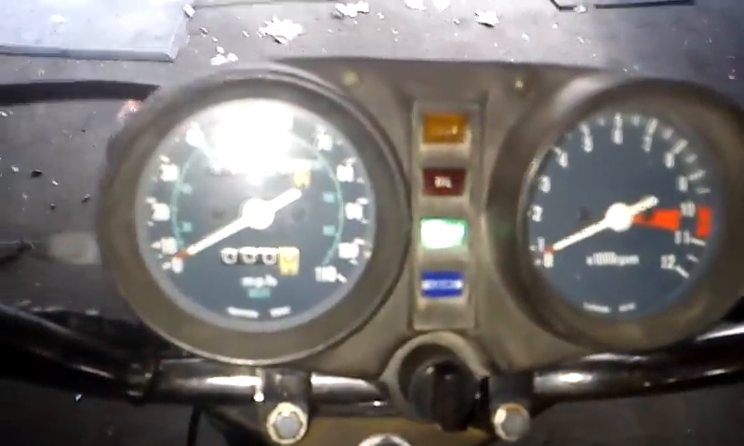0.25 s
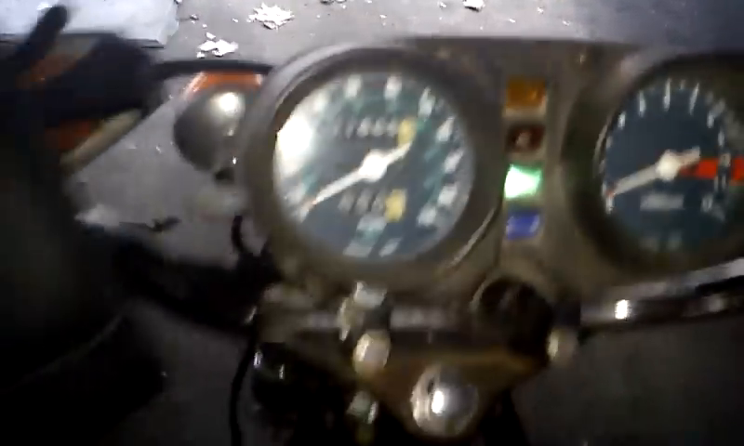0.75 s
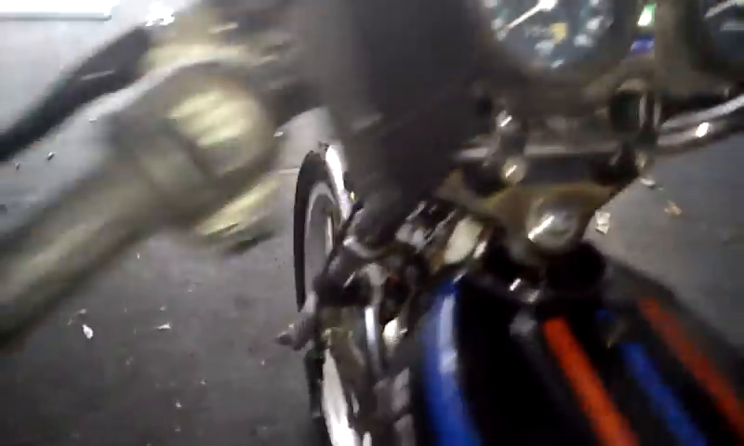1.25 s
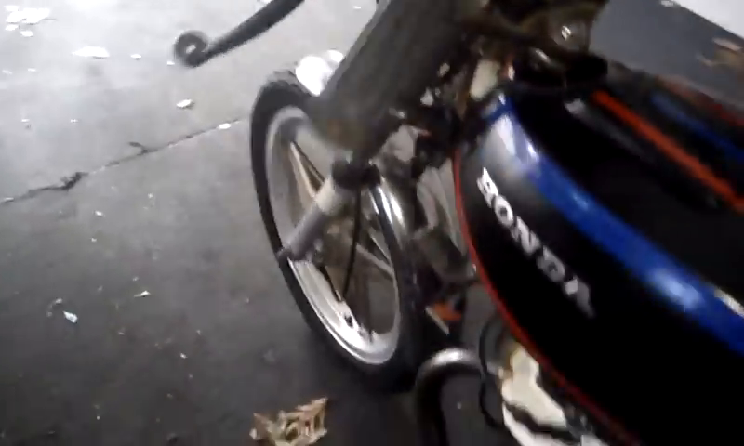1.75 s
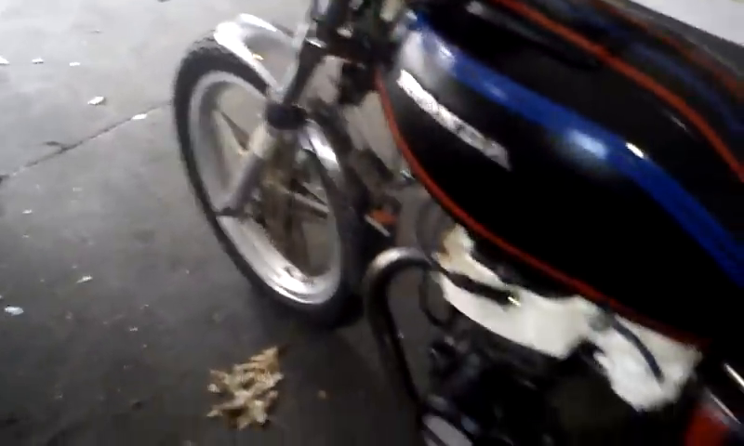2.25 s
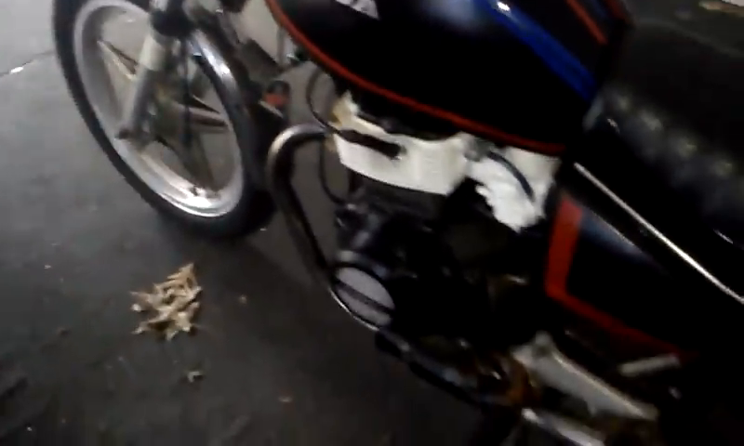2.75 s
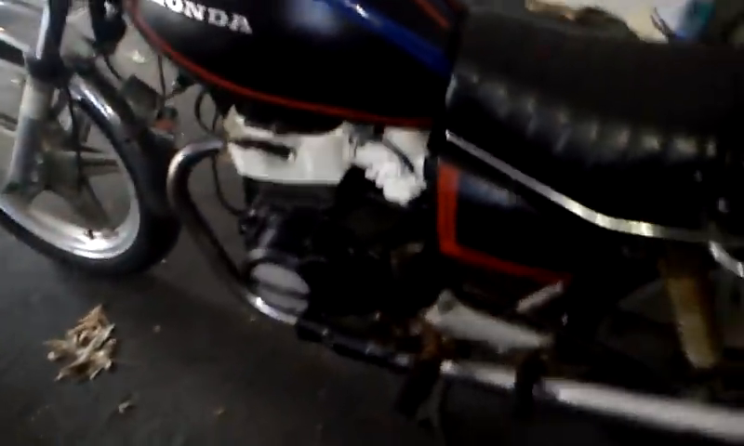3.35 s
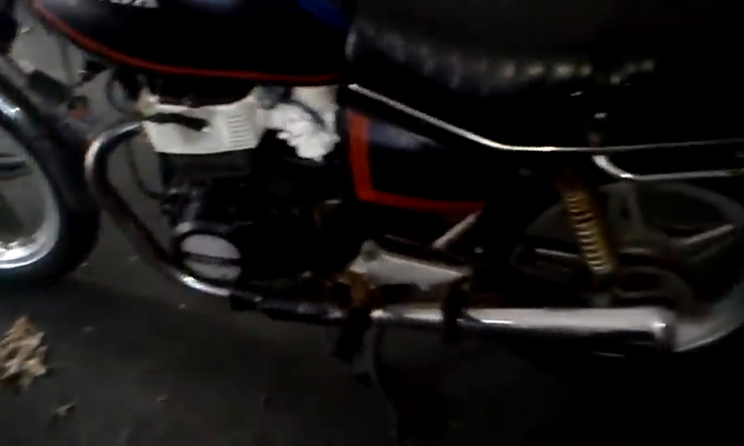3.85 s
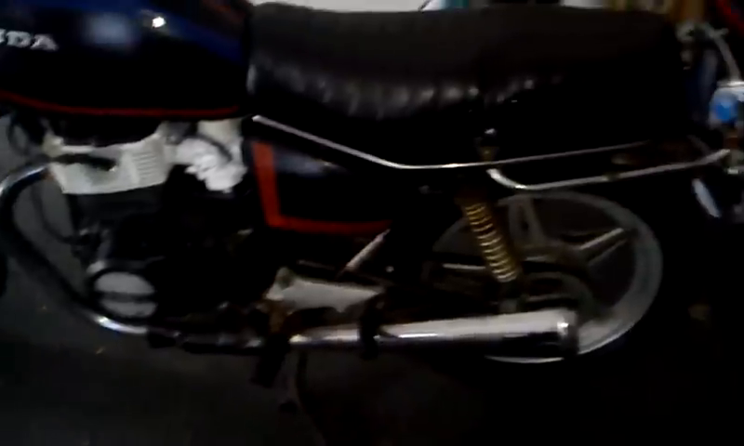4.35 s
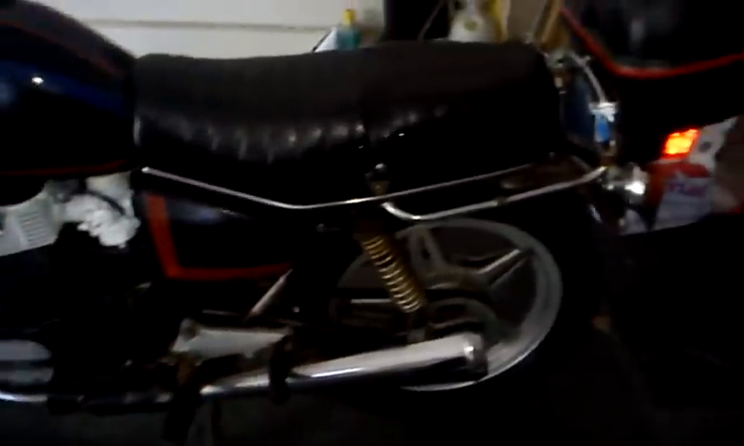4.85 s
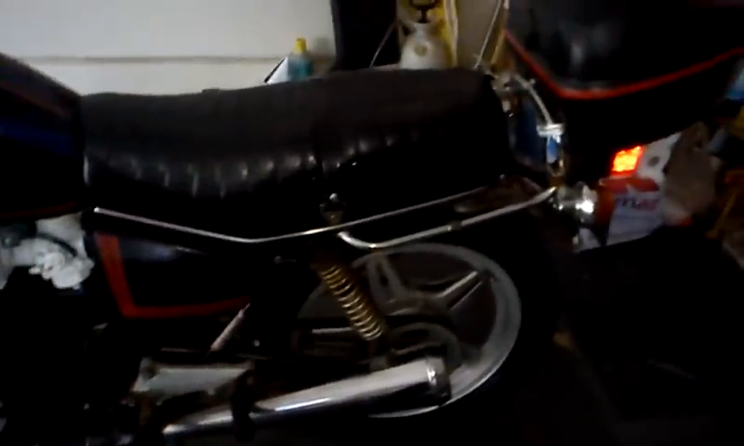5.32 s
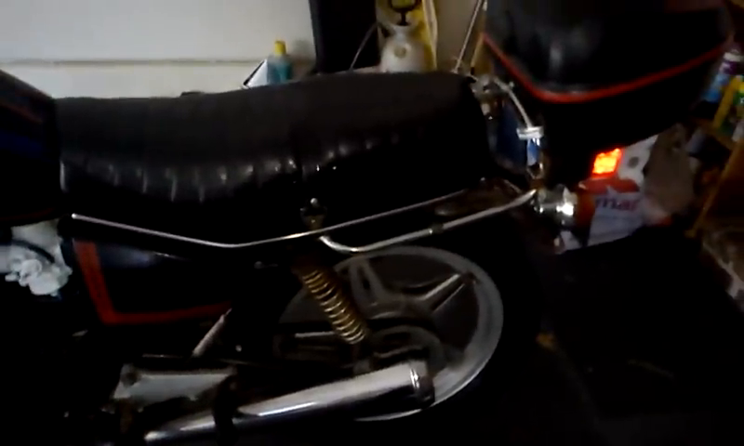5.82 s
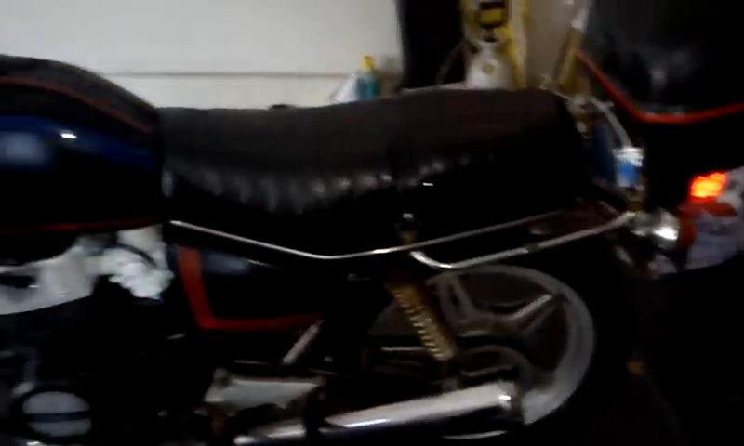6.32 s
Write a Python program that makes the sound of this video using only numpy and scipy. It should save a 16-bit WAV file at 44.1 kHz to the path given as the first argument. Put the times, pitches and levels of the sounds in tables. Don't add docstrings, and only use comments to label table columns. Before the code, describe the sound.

Close handheld pass along an idling motorcycle indoors: quick lumpy putter, raspy intake breaths, bright metallic valve chatter and short garage reflections.

```python
import sys
import numpy as np
from scipy import signal
from scipy.fft import rfft, irfft, next_fast_len
from scipy.io import wavfile
from scipy.ndimage import uniform_filter1d

SR = 44100
rng = np.random.default_rng(int(sys.argv[2]) if len(sys.argv) > 2 else 0)


def boost_factor(decibels):
    exponent = np.asarray(decibels, float) / 20
    return 10 ** exponent


def waveform_to_disk(signal):
    frames = np.transpose(np.atleast_2d(signal))
    scaled = np.clip(frames, -1, 1) * 32767
    samples = np.round(scaled).astype(np.int16)
    wavfile.write(sys.argv[1], SR, samples)


N = 290178

# (time [s], crank speed [rpm])
IDLE_RPM = [(0, 1200.6), (.2, 1342.7), (.46, 1023.6), (.82, 1104.9), (1.18, 1035.9), (1.26, 898.1),
            (1.82, 984.7), (2.32, 938.3), (2.38, 872.2), (3.46, 954.3), (3.58, 885.1), (3.76, 953.6),
            (4.64, 1002.3), (4.9, 984.3), (5.08, 837.9), (5.9, 1110.5), (6.02, 802.7), (6.58, 918.3)]
FIRST_FIRING_CYCLES = .2305
# (time [s], delay [ms], crack [dB], intake [dB])
STUMBLES = [(.02, 0, 2, -3), (.12, .4, -3, 1), (.21, 0, -3, -18), (.3, -1.5, 0, 0), (.41, 1.7, 1, 0),
            (.52, -1, -1, -6), (1.2, 0, -1, -3), (1.83, -.9, 0, 0), (2.61, 1.2, 0, 0), (2.74, .8, -1, 2),
            (2.87, -2.4, 0, -1), (3.0, -1.4, 0, 0), (3.13, 1.5, 0, 1), (3.26, 1.8, 1, 0),
            (3.78, 2.5, -1, 3), (3.9, -1, 0, 0), (4.02, -4, 0, 0), (4.27, 0, 1, -2), (4.4, 3.4, -2, 0),
            (4.52, 2.4, 1, 0), (4.63, -2.5, 1, 0), (4.75, 0, -2, 2), (5.0, 0, 1, -3), (5.53, 1.4, 0, 1),
            (5.76, -1.5, -1, 2)]
# (time [s], place [0 front, 1 side, 2 tail])
WALK = [
    (1.08, 0),
    (1.3, 1),
    (2.5, 1),
    (3.4, 2),
]
# (time [s], crack [dB], garage return [dB], intake rasp [dB], valve gear [dB])
HEARD_DB = [(.1, -16, -35, -30, -27.5), (.9, -16, -31.5, -22.5, -27.5), (1.8, -12.5, -29, -21, -30),
            (2.6, -14, -32.5, -19.5, -25), (3.6, -15, -28, -19, -28.5), (4.8, -17.5, -30.5, -21, -27),
            (6.4, -16.5, -29.5, -20.5, -28.5)]
# (time [s], share [0-1])
SHADE = [(0, 0.06), (1.7, 0.23), (2.3, 0.26), (2.7, 1), (3.3, 0.7), (4.5, 0.17), (5.1, 0.56), (5.7, 0.04),
         (6.3, 0.65)]
SHADED_LOW_DB, SHADED_HIGH_DB, OPEN_LOW_DB = -7, -8, -0.5
DRONE_DB, DRONE_FADE_S = 2.5, 0.52

# (frequency [Hz], level [dB])
GEAR_SPECTRUM = [(290, 7), (500, -1), (667, 2), (1100, -3.5), (1720, -4.5), (2050, -5.5), (2690, -3.5),
                 (3490, -6.5), (7270, -6.5), (9030, -7), (11900, -19), (15600, -17)]
# (frequency [Hz], width [Hz], level [dB])
CASES = [(1310, 180, -21.5), (2140, 450, -14.5), (3480, 69, -17), (4190, 27, -21), (8960, 170, -19)]
# (time [ms], gain [dB])
DUCK_DB = [(-19, -3.5), (-15.5, 2.5), (9, 0.5), (2, -13), (29.5, -4), (34.5, 5.5), (54, 1.5), (81, -2.5),
           (104, -1.5)]
# (frequency [Hz], level [dB])
RUMBLE_SPECTRUM = [(20, -13), (40, -6.5), (70, -20), (110, -1), (160, -5), (250, -5.5), (400, -11),
                   (600, -13.5), (1000, -25.5), (2000, -48)]
# (time [ms], level [dB])
CHURN_DB = [(0, 11), (4, -19), (15, 3), (25, 2.5), (40, 0.5), (60, 1), (85, 4), (110, -0.5)]

# (frequency [Hz], level per Hz [dB])
SNAP_SPECTRUM = [(290, -50), (500, -8), (1390, -13), (3590, -0.5), (4860, -5), (6870, 3.5), (8280, -20),
                 (9030, -1.5), (15600, -15)]
# (time from firing [ms], level [dB])
SNAP_ENVELOPE = [(-22, -46), (-29, -28), (-30, -5.5), (-25.5, -1.5), (-24, -7), (5, -12), (12, -30)]
# (frequency [Hz], level per Hz [dB])
RASP_SPECTRUM = [(290, -44), (500, -15.5), (1200, 0.5), (2110, 2.5), (2810, 0), (4090, -1), (5150, -5),
                 (9030, -18.5), (11900, -44), (15600, -33)]
# (time from firing [ms], level [dB])
RASP_ENVELOPE = [(-38, -43), (-20.5, -11.5), (-14, 0), (-38, -1.5), (-1.5, -9.5), (15, -16)]

# (frequency [Hz], level per Hz [dB])
CRACK_SPECTRUM = [(410, -38), (700, -11.5), (1450, -13.5), (2110, -12.5), (3160, -8), (4090, -6.5),
                  (7940, -8.5), (8920, -3.5), (12300, -14), (15600, -4.5)]
# (low [Hz], high [Hz])
JET_HZ = (4060, 8870)
# (time [s], frequency [Hz], extra level [dB])
WHISTLES = [(.86, 3160, 3), (1.197, 3160, 3), (1.585, 4900, -2), (2.206, 4870, -4), (2.332, 4800, 3),
            (2.606, 3560, -9), (3.648, 9470, 4), (5.003, 4040, 5), (5.651, 8400, -2), (6.142, 10330, 10),
            (6.555, 7740, -3)]
# (time [ms], level [dB])
RETURN_DB = [(0, -60), (6, -5), (10, 2), (15, -5), (23, -0.5), (32, 5), (42, -2.5), (52, 5.5), (65, -10.5),
             (95, -4)]

# (arrival [ms], frequency [Hz], rise [ms], front [dB], side [dB], tail [dB])
RINGS = [(-1.6, 213, 1.8, -22, -19, -23), (-2.6, 102, 9.4, -12, -12, -12),
         (3.4, 241, 1.9, -23, -30, -50), (7.1, 345, 9.2, -29, -34, -36),
         (7.5, 184, 15.4, -24, -21, -25), (7.9, 154, 15.6, -23, -25, -35),
         (13.3, 300, 12.0, -24, -29, -50), (13.7, 274, 25.6, -50, -29, -25),
         (14.8, 52, 16.9, -31, -30, -25), (18.7, 104, 13.5, -16, -26, -50),
         (21.9, 244, 11.6, -29, -21, -18), (24.6, 449, 6.1, -30, -32, -50),
         (26.8, 186, 11.2, -19, -24, -35),
         (29.4, 96, 6.4, -50, -26, -18.5), (29.9, 64, 16.5, -22.5, -25, -26),
              (42.9, 142, 7.5, -25, -22, -21), (45.2, 109, 10, -12, -30, -22),
              (45.5, 102, 10, -50, -15.5, -20), (76.6, 200, 3.8, -18, -23, -39),
              (84.2, 264, 8.6, -50, -29, -24), (86.0, 107, 7.9, -29, -34, -30),
              (98.0, 194, 3.7, -27, -32, -28)]
# (arrival [ms], frequency [Hz], rise [ms], front [dB], side [dB],
# tail [dB])
AFTERSWING = (55, 95, 12, -25, -19.5, -17.5)
USUAL_CYCLE_MS, SWING_LAG = 125, .35

# (frequency [Hz], width [Hz], level [dB])
TANK_HUM = [(458, 70, -40), (592, 36, -44.5)]
# (start [s], end [s], frequency [Hz], level [dB])
SINGING_TONES = [
    (1.58, 1.66, 5000, -37),
    (2.42, 2.72, 3520, -43),
    (5.656, 5.754, 8400, -32),
    (6.15, 6.208, 10100, -52),
]
EDGE_HZ = 15750


def evened(x):
    return x / np.sqrt(np.mean(x ** 2) + 1e-20)


def smooth_noise(count, samples):
    return evened(uniform_filter1d(rng.standard_normal(count), samples))


def coloured(x, points):
    hz, db = np.transpose(points)
    size = next_fast_len(len(x))
    gain = boost_factor(np.interp(np.log(np.fft.rfftfreq(size, 1 / SR) + 1), np.log(hz), db))
    return evened(irfft(rfft(x, size) * gain, size)[:len(x)])


def resonate(x, hz, width_hz):
    return signal.lfilter(*signal.iirpeak(hz, hz / width_hz, SR), x)


def ring_twice(x, hz, width_hz):
    return evened(resonate(resonate(x, hz, width_hz), hz, width_hz))


def add(mix, s, sound):
    at = round(s * SR)
    sound = sound[max(-at, 0):]
    part = mix[max(at, 0):][:len(sound)]
    part += sound[:len(part)]


def stumble(s, column):
    rows = np.array(STUMBLES)
    near = abs(s[:, None] - rows[:, 0]) < .04
    return near @ rows[:, column]


def cycles():
    s, rpm = np.transpose(IDLE_RPM)
    lead = SR // 10
    t = np.arange(-lead, N) / SR
    count = np.cumsum(np.interp(t, s, rpm)) / 120 / SR
    count -= count[lead] + FIRST_FIRING_CYCLES
    times = np.interp(np.arange(-1, count[-1]), count, t)
    return times + stumble(times, column=1) / 1000


def place(s):
    return np.interp(s, *np.transpose(WALK))


def heard(s, column, spread_db):
    rows = np.array(HEARD_DB)
    return np.interp(s, rows[:, 0], rows[:, column]) + spread_db * rng.standard_normal(len(s))


def since_firing(table):
    ms, db = np.transpose(table)
    starts = cycles() + ms[0] / 1000
    t = np.arange(N) / SR
    latest = starts[np.searchsorted(starts, t) - 1]
    return np.interp((t - latest) * 1000 + ms[0], ms, db)


def metal(x, drift=0.022, swell_db=3.0):
    out = x
    for hz, width_hz, db in CASES:
        swell = smooth_noise(N, 3000)
        flat, sharp = [evened(resonate(x, hz * (1 + side * drift), width_hz)) for side in (-1, 1)]
        lean = np.clip(.5 + .5 * smooth_noise(N, 6000), 0, 1)
        out = out + boost_factor(db + swell_db * swell) * (lean * flat + (1 - lean) * sharp)
    return evened(out)


def valve_gear(ticks_per_s=900, tick_db=-6, spread_db=-0.5, patchy_db=1.5):
    times = cycles()
    struck = rng.random(N) < ticks_per_s / SR
    sizes = boost_factor(spread_db * np.minimum(rng.exponential(1, N), 2.5))
    ticks = struck * rng.choice([-1, 1], N) * sizes
    hiss = metal(coloured(rng.standard_normal(N) + boost_factor(tick_db) * evened(ticks), GEAR_SPECTRUM))
    flicker_db = patchy_db * smooth_noise(N, 500)
    level_db = np.interp(np.arange(N) / SR, times + 0.14, heard(times, column=4, spread_db=.5))
    return boost_factor(level_db + flicker_db) * hiss


def rumble(level_db=-32):
    return boost_factor(level_db + since_firing(CHURN_DB)) * coloured(rng.standard_normal(N), RUMBLE_SPECTRUM)


def intake(snap_db=-4.5, rasp_db=-1.0, grit_db=3.0):
    times, out = cycles(), np.zeros(N)
    efforts_db = heard(times, column=3, spread_db=0.9) + stumble(times, column=3)
    parts = ((SNAP_SPECTRUM, SNAP_ENVELOPE, snap_db), (RASP_SPECTRUM, RASP_ENVELOPE, rasp_db))
    for spectrum, envelope, db in parts:
        ms = np.arange(envelope[0][0], envelope[-1][0], 1000 / SR)
        shape_db = np.interp(ms, *np.transpose(envelope))
        gate = np.zeros(N)
        for s, effort_db in zip(times, efforts_db):
            add(gate, s + ms[0] / 1000, boost_factor(effort_db + db + shape_db))
        grit = boost_factor(grit_db * smooth_noise(N, 50))
        out += gate * metal(coloured(rng.standard_normal(N) * grit, spectrum))
    return out


def cracks(tail_db=-14, top_db=7.0, hidden_db=2.0, tail_ms=9.2, dull_hz=9000, peak_db=1.5, back_db=2.5):
    whistle_db, width_hz, lumps_db, rise_ms = -11, 600, 1.5, 1.2
    out, size = np.zeros(N), round(.1 * SR)
    ms = np.arange(size) * 1000 / SR
    times, (when, own_hz, more_db) = cycles(), np.transpose(WHISTLES)
    cracks_db = heard(times, column=1, spread_db=.5) + stumble(times, column=2)
    returns_db = heard(times, column=2, spread_db=.7)
    low_hz, high_hz = JET_HZ
    absorbed = signal.butter(1, dull_hz, fs=SR)
    u = ms / rise_ms / 2
    burst = (u * np.exp(1 - u)) ** 3
    envelope = burst + boost_factor(tail_db) * np.exp(-ms / tail_ms) * (ms > rise_ms)
    for s, crack_db, return_db in zip(times, cracks_db, returns_db):
        own = abs(when - s) < .02
        extra_db = more_db @ own
        jet_hz = high_hz if rng.random() < .6 - .2 * place(s) else low_hz
        jet_hz *= 1 + .03 * rng.standard_normal()
        hz = own @ own_hz or jet_hz
        lumps = np.c_[np.geomspace(1500, 15000, num=14), lumps_db * rng.standard_normal(14)]
        lumps[-2:, 1] -= top_db * rng.random() * np.array([1, 2]) + hidden_db * (1 - place(s) / 2)
        plain = coloured(coloured(rng.standard_normal(size), CRACK_SPECTRUM), lumps)
        jet = evened(plain + boost_factor(whistle_db + extra_db) * ring_twice(plain, hz, width_hz))
        walls = boost_factor(np.interp(ms - 3, *np.transpose(RETURN_DB)) + 0.83 * smooth_noise(size, 40))
        source = jet if extra_db > 3 else plain
        echo = signal.lfilter(*absorbed, source[::-1] * walls)
        echo = echo / echo[size // 4:size // 2].std()
        lag_s = .0018 * min(place(s), 1) - .0028
        puff = boost_factor(crack_db + peak_db) * jet * envelope
        add(out, s + lag_s, puff + boost_factor(return_db + back_db) * echo)
    return out


def thumps(wander=.003, spread_db=.5):
    out, ms = np.zeros(N), np.arange(-3, 160, 1000 / SR)
    rings = np.vstack([RINGS, [AFTERSWING]])
    arrival, hz, rise = rings[:, :3].T[:, :, None]
    sign = np.where(rings[:, 0] < 0, -1, 1)
    is_swing = np.arange(len(rings))[:, None] == len(rings) - 1
    late = np.clip(rings[:, 0] / 40, 0, 1)
    times = cycles()
    lengths_s = np.diff(times, append=times[-1] + USUAL_CYCLE_MS / 1000)
    for s, cycle_s in zip(times, lengths_s):
        stretch, *luck = rng.standard_normal(len(rings) + 1)
        lag_ms = is_swing * SWING_LAG * (1000 * cycle_s - USUAL_CYCLE_MS)
        u = np.maximum(ms * (1 + wander * stretch) - arrival - lag_ms, 0)
        size = sign * np.array([np.interp(place(s), (0, 1, 2), boost_factor(r[3:])) for r in rings])
        size *= boost_factor(spread_db * np.array(luck) * late)
        waves = u / rise * np.exp(1 - u / rise) * np.sin(2 * np.pi * hz * u / 1000)
        add(out, s + ms[0] / 1000, size @ waves)
    return out


def tank(thump, fade_db=-11.0):
    gas = 0.47 * rng.standard_normal(N) * boost_factor(since_firing(CHURN_DB)) / 8
    shake = evened(np.gradient(np.gradient(thump))) + gas
    hum = sum(boost_factor(db) * ring_twice(shake, hz, width_hz) for hz, width_hz, db in TANK_HUM)
    return hum * boost_factor(fade_db * np.maximum(place(np.arange(N) / SR) - 1, 0))


def singing_tones(width_hz=350):
    out = np.zeros(N)
    for start_s, end_s, hz, db in SINGING_TONES:
        noise = rng.standard_normal(N // 16)[:round((end_s - start_s) * SR)]
        buzz = ring_twice(noise, hz, width_hz)
        add(out, start_s, boost_factor(db) * buzz * signal.windows.tukey(len(buzz), .5))
    return out


def heard_from_place(x, sway_db=2.0):
    t = np.arange(N) / SR
    shade = np.interp(t, *np.transpose(SHADE))
    sway = smooth_noise(N, 4000)
    low_db = OPEN_LOW_DB + SHADED_LOW_DB * shade + DRONE_DB * np.exp(-t / DRONE_FADE_S)
    high_db = SHADED_HIGH_DB * shade + sway_db * sway
    low = signal.sosfiltfilt(signal.butter(2, 900, "low", fs=SR, output="sos"), x)
    high = signal.sosfiltfilt(signal.butter(3, 11000, "high", fs=SR, output="sos"), x)
    return x + (boost_factor(low_db) - 1) * low + (boost_factor(high_db) - 1) * high


def scene():
    steady = boost_factor(since_firing(DUCK_DB)) * (valve_gear() + singing_tones())
    noises = steady + intake() + cracks()
    thump = thumps()
    return (rumble() + thump + tank(thump) + heard_from_place(noises))[None]


def band_limit(x):
    return signal.sosfilt(signal.butter(12, 16640, fs=SR, output="sos"), x)


def record(dry):
    limited = 0.72 * np.tanh(dry / 0.7)
    lowpass = signal.firwin(301, EDGE_HZ, window=("kaiser", 8), fs=SR)
    narrow = signal.oaconvolve(limited, lowpass[None], "same")
    return band_limit(narrow)


dry = scene()
out = record(dry)
waveform_to_disk(out)
```